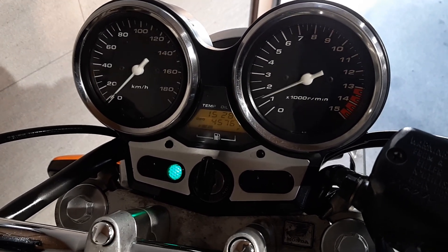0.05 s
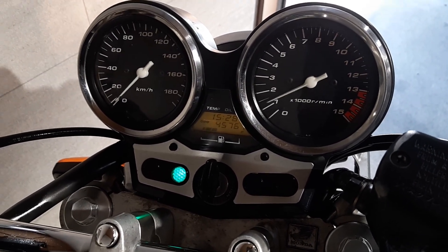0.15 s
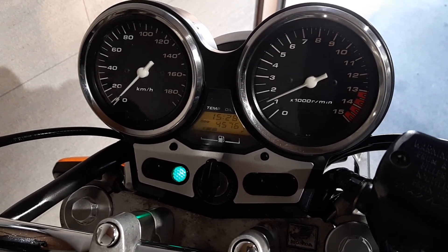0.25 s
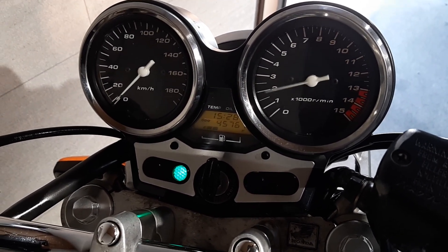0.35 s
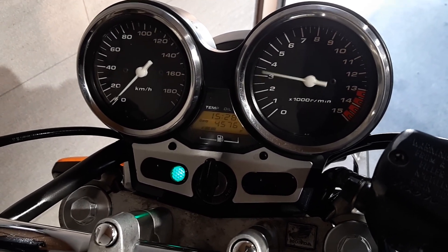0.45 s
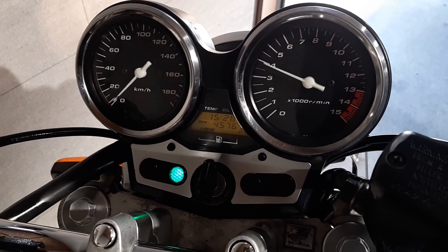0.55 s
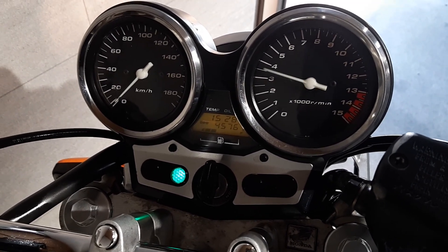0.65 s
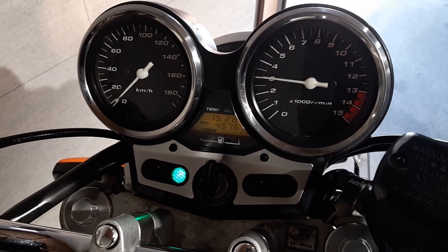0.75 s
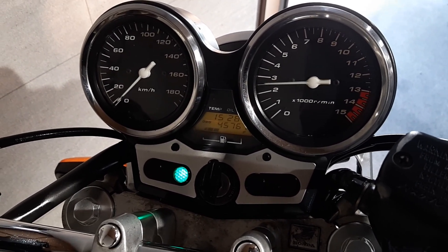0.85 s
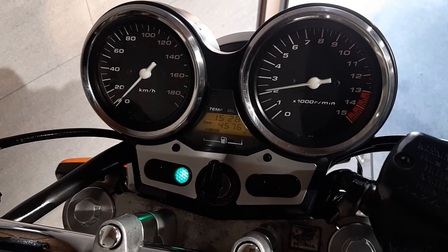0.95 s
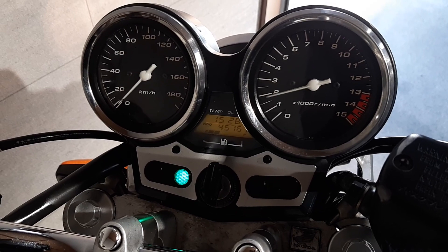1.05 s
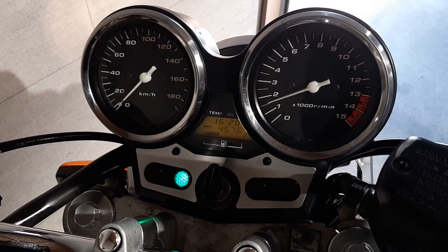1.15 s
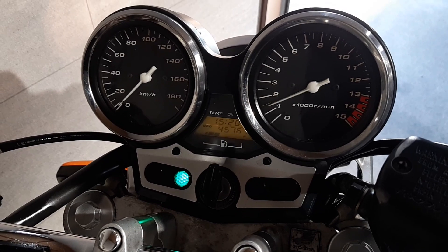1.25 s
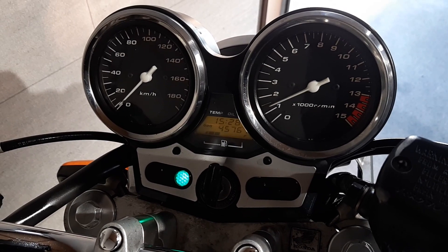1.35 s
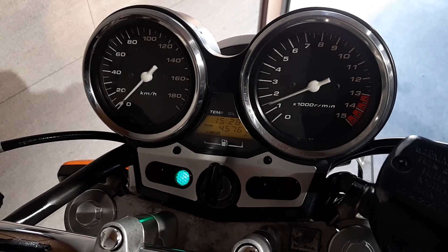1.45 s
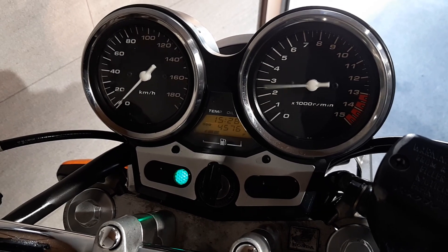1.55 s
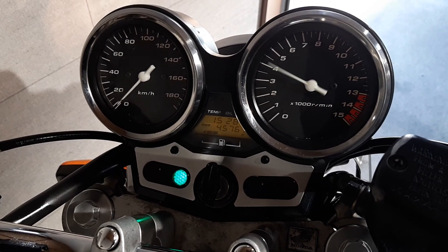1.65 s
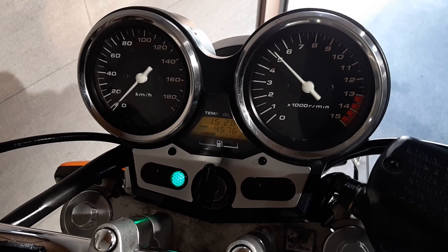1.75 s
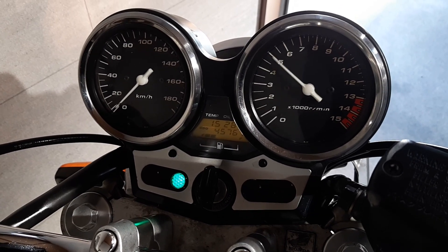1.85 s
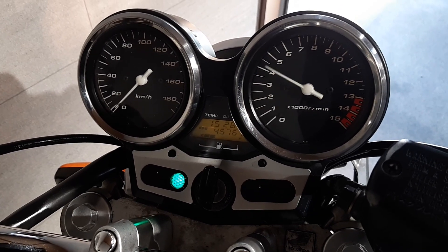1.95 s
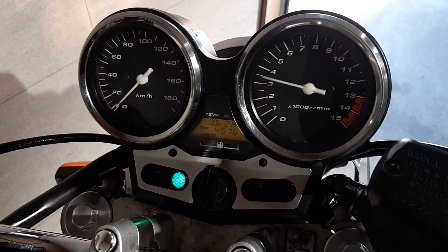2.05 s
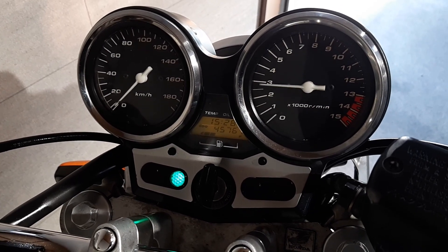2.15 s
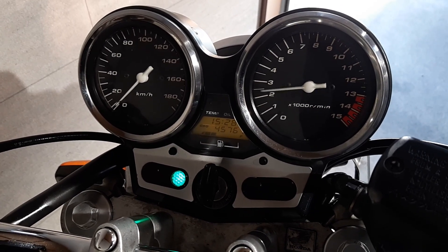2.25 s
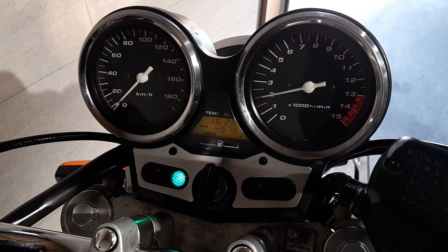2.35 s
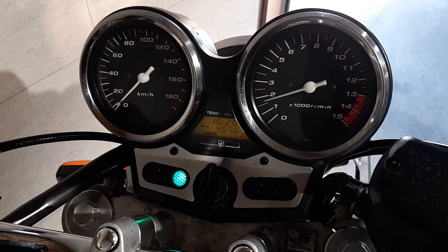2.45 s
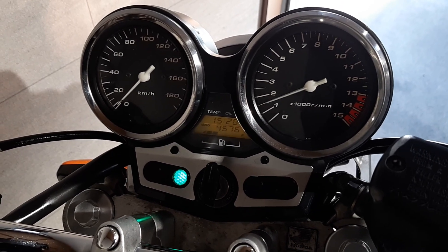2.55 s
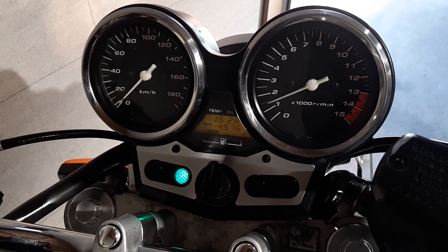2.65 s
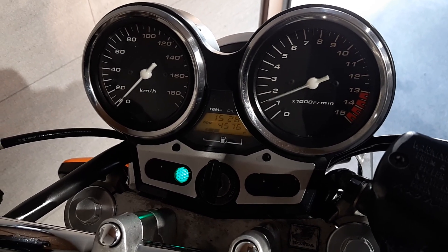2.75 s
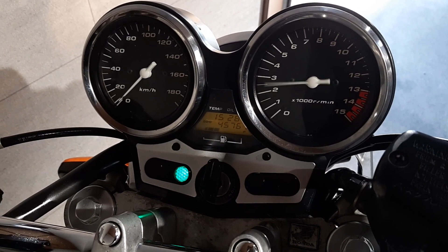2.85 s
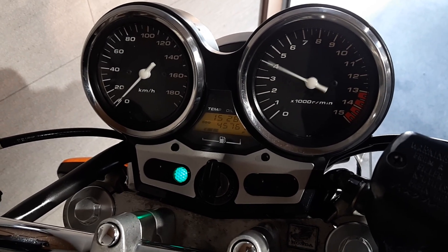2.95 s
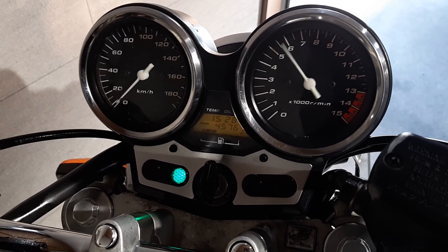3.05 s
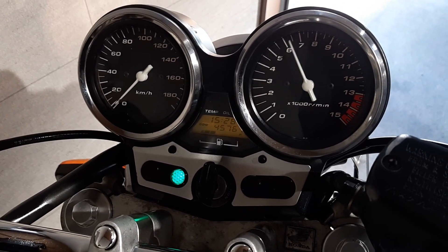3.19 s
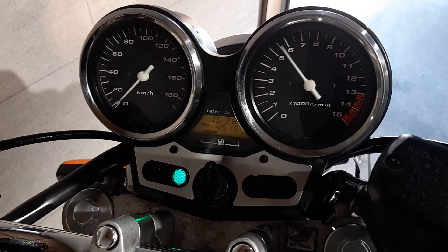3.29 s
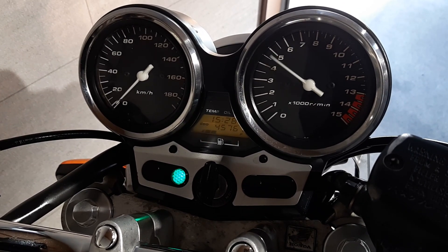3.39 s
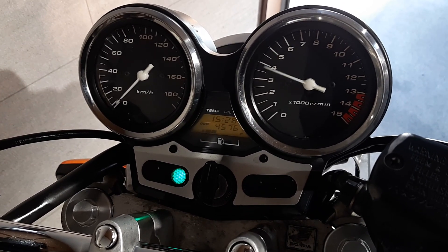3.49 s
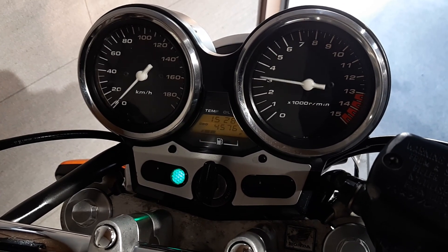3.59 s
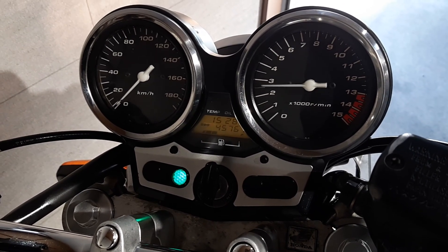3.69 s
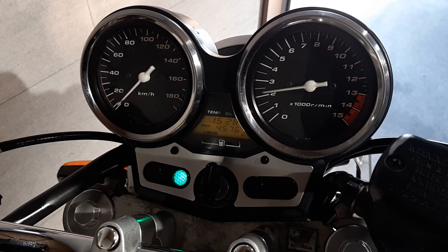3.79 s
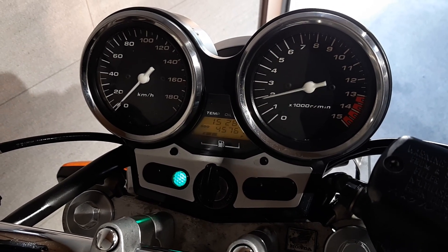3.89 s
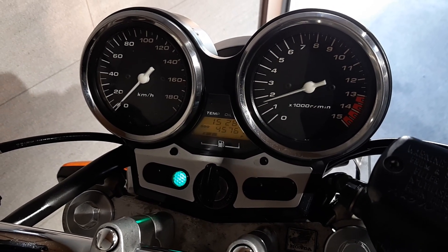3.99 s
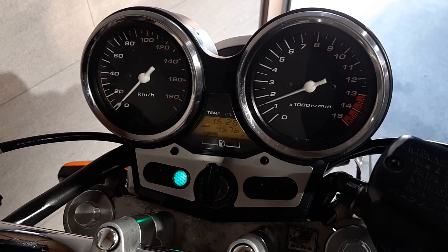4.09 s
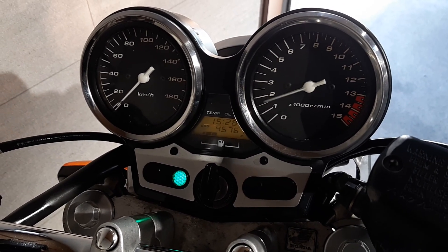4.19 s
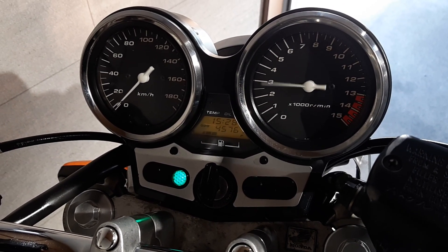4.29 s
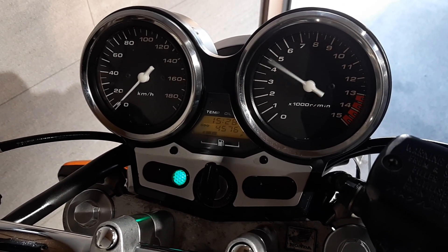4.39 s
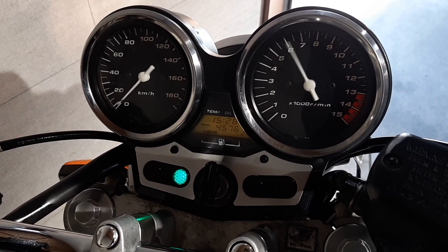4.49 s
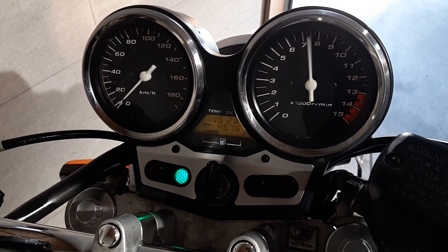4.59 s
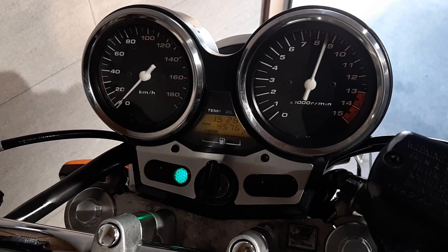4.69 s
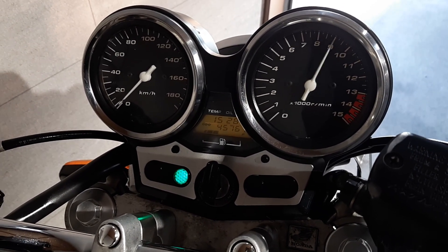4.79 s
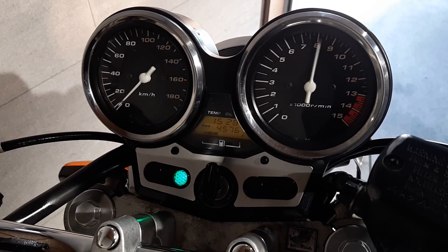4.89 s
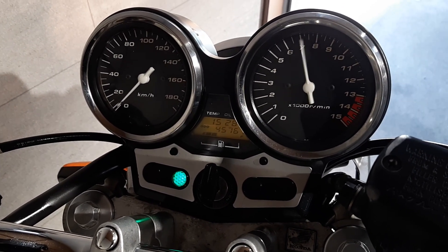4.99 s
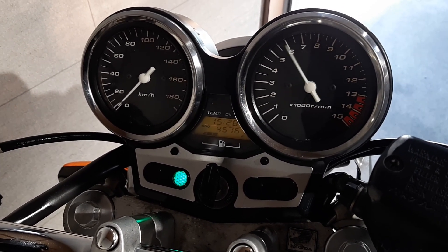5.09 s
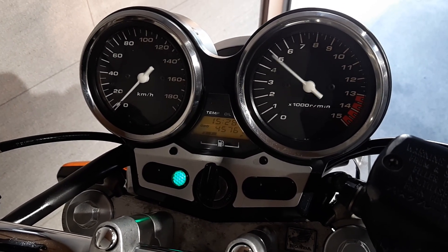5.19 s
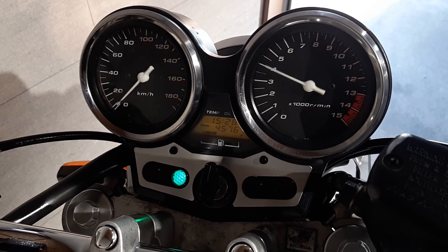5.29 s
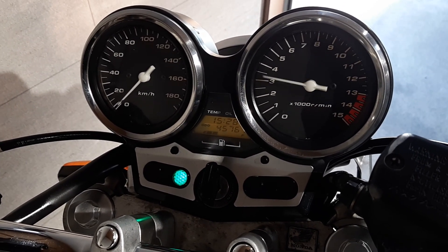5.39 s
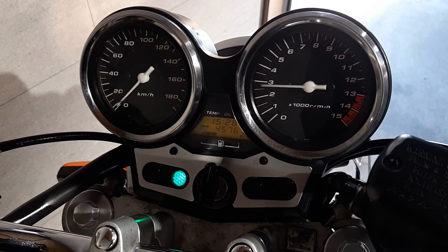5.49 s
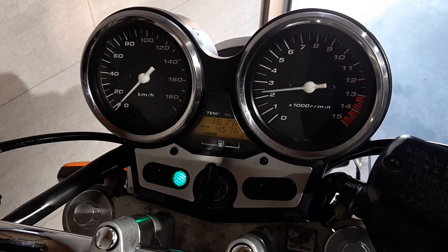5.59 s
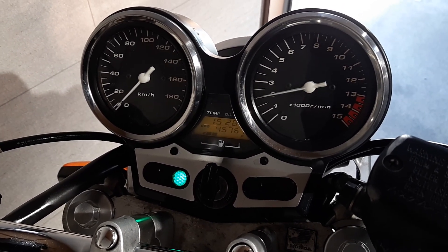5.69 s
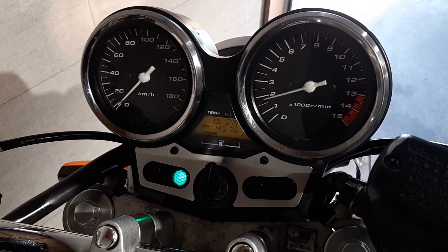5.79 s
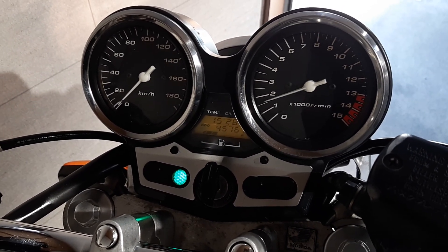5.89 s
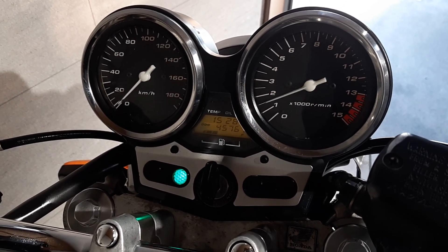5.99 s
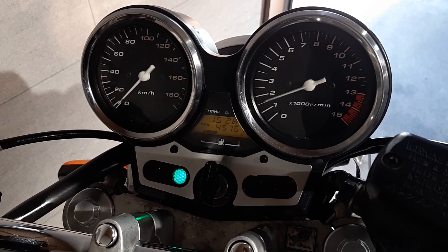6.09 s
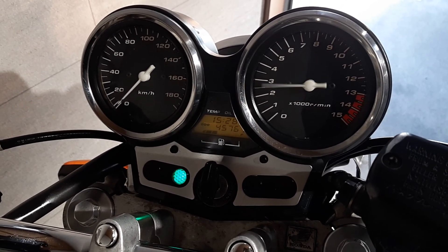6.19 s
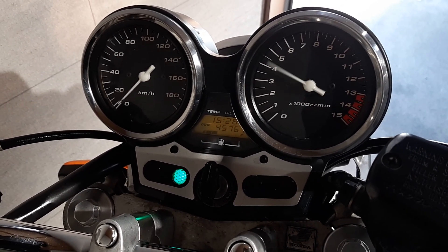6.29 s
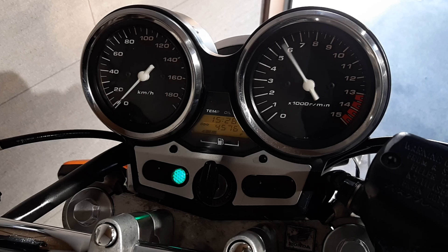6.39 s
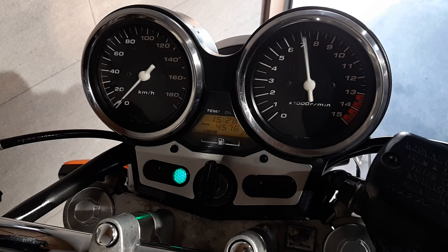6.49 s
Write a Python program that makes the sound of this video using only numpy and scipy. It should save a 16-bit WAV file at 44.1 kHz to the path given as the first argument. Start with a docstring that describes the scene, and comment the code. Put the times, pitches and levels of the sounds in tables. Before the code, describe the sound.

A four-cylinder motorcycle idles low and ragged for an instant in a shop, then the throttle is blipped five times. Each rev leaps from a throaty burble to a smooth, hard howl and sinks back with a soft, uneven overrun. Intake hiss and metallic valve and chain rattle rise with speed. Close stereo pickup at the handlebars, bass central, treble wide, with short wall reflections.

```python
"""A four-cylinder motorcycle engine idles for a moment, then is revved five times inside a shop.
Firing pulses ring the resonances of a loud exhaust pipe, and gas rushes out behind them.
The throttle hisses and whistles at the intake as it opens; valve gear and cam chain rattle with the speed.
The walls answer each ear differently: the bass stays near mono, the treble is broad."""
import sys
import numpy as np
from scipy import signal
from scipy.fft import rfft, irfft, next_fast_len
from scipy.io import wavfile
from scipy.ndimage import map_coordinates

SR = 44100
rng = np.random.default_rng(int(sys.argv[2]) if len(sys.argv) > 2 else 0)


def int16_out(signal):
    """Quantize to a 16-bit WAV file."""
    q = np.round(np.clip(np.atleast_2d(signal).T, -1, 1) * 32767)
    wavfile.write(sys.argv[1], SR, q.astype(np.int16))


def level_to_linear(level):
    """Convert decibel levels to linear amplitude factors, elementwise."""
    exponent = np.asarray(level, float) / 20
    return 10 ** exponent


N = 288414  # length in samples


def unit(x):
    """Normalisation: the signal scaled to an rms of 1."""
    return x / np.sqrt(np.mean(x ** 2) + 1e-20)


def along(points, hz):
    """Interpolation of (f/Hz, value) points on a logarithmic frequency axis."""
    f, v = np.transpose(points)
    return np.interp(np.log(hz + 1), np.log(f + 1), v)


def curves(rows):
    """Linear interpolation in time: one value per sample for each column after t/s."""
    t, *columns = np.transpose(rows)
    return [np.interp(np.arange(N) / SR, t, column) for column in columns]


def wobble(rate):
    """Slow random modulation: a smooth curve through rate random knots per second."""
    knots = rng.standard_normal(int(N * rate / SR) + 4)
    return map_coordinates(knots, [np.arange(N) * rate / SR])


def filtered(x, response):
    """Linear filtering: the spectrum of x times a complex response of frequency."""
    m = next_fast_len(N + SR // 2)
    hz = np.fft.rfftfreq(m, 1 / SR)
    return irfft(rfft(x, m) * response(hz), m)[..., :N]


def coloured(x, spectrum):
    """Spectral shaping: x filtered through (f/Hz, level/dB) points, then scaled to rms 1."""
    return unit(filtered(x, lambda hz: level_to_linear(along(spectrum, hz))))


def pipe(hz):
    """Modal superposition: resonances add with their signs; like-signed neighbours leave a notch between."""
    # exhaust and shop resonances: f/Hz, width/Hz, level/dB, sign
    resonances = [(58, 30, -14, -1), (88, 15, 3, 1), (117, 18, -3, -1), (151, 18, -5, -1), (177, 16, -1, 1),
                  (211, 20, 0, 1), (247, 16, -2, 1), (277, 14, -1, 1), (299, 18, 0, -1), (370, 30, -8, -1),
                  (447, 22, -4, -1), (478, 22, -4, 1), (530, 35, -5, 1), (590, 35, -6, 1),
                  (640, 40, -4, -1), (730, 45, -5, -1), (900, 60, -3, -1), (1120, 100, -10, -1)]
    modes = 0
    for centre, width, db, sign in resonances:
        modes = modes + sign * level_to_linear(db) * 1j * hz * width / (centre * centre - hz * hz + 1j * hz * width)
    return modes * 1j * hz / (35 + 1j * hz)  # first-order high-pass at 35 Hz


def exhaust(rate):
    """Source and filter: multiples of the firing rate and random blow errors ring the pipe; gas noise follows."""
    # throttle, even under load and ragged on the overrun and at idle: t/s, blow level/dB, ragged share (0-1)
    throttle = [(0, -18.5, 0.48), (.13, -22, 0.54), (.22, -16.5, 0.26), (.28, -10, 0.16), (.34, -6.5, 0.4),
                (.45, -9, 0), (.5, -14, 0.6), (.6, -14, 0.31), (.74, -18, 0.3), (.82, -20, 0.23),
                (1, -21.5, 0.36), (1.15, -20, 0.43), (1.28, -20, 0.47), (1.34, -19.5, 0.4),
                (1.4, -8.5, 0.18), (1.48, -9.5, 0.17), (1.66, -7, 0.23), (1.76, -13, 0.03),
                (1.82, -13.5, 0.37), (1.95, -14, 0.26), (2.08, -16.5, 0.38), (2.2, -21.5, 0.28),
                (2.45, -22, 0.54), (2.56, -21.5, 0.57), (2.66, -20, 0.23), (2.74, -11, 0.17),
                (2.9, -6.5, 0.13), (3.06, -7.5, 0.05), (3.22, -10.5, 0.24), (3.3, -15.5, 0.27),
                (3.45, -14.5, 0.42), (3.6, -18.5, 0.45), (3.72, -20.5, 0.27), (3.9, -21, 0.37),
                (4.08, -19, 0.4), (4.16, -10.5, 0.24), (4.3, -7, 0.11), (4.5, -7.5, 0.03), (4.7, -10, 0.18),
                (4.8, -7.5, .04), (4.92, -9.5, 0.11), (5.03, -14, 0.15), (5.12, -19, 0.49),
                (5.3, -19, 0.37), (5.42, -21.5, 0.42), (5.55, -24.5, 0.35), (5.75, -25.5, 0.43),
                (5.98, -24.5, 0.34), (6.07, -12, 0.34), (6.2, -8.5, .08), (6.54, -7.5, 0.02)]
    # header pipes shape the blow with speed: firings per s,
    # level/dB of the half, first, second, third, fourth and fifth multiple
    header = [(45.2, -13, 2, 8.5, -14, -10, -4), (65, -20, 1.5, 4, -2.5, -3, -12),
              (82, -17, 1, -17, -3.5, -10, -16), (108.5, -21, 3, 2, -6.5, -32, -18),
              (162, -48, -5, -3.5, -13, -13.5, -18), (190, -16.5, 0, -5.5, -21, -9, -20),
              (219, -8.5, -1, -4.5, -6.5, -11.5, -20), (301, -13.5, -4, -5, -12.5, -21, -22)]
    # spectrum of the gas rush in the pipe: f/Hz, relative level/dB
    gas_spectrum = [(190, -14), (330, -0.5), (398, -4), (592, -5), (720, -1.5), (860, -5), (1610, -13.5),
                    (2500, -16.5), (3250, -12), (5500, -120)]
    # share of the walls in the ringing exhaust: f/Hz, level/dB
    wall_share = [(60, -28), (200, -28), (500, -18), (1200, -6)]

    blow_db, ragged = curves(throttle)
    firings = np.cumsum(rate) / SR
    speeds, *multiples_db = np.transpose(header)

    weak_db = -27 * ragged  # weak, ragged blows are rounder: all but the firing tone fades
    even = 0
    for k, db in zip([.5, 1, 2, 3, 4, 5], multiples_db):
        level_db = np.interp(rate, speeds, db) + (k != 1) * weak_db
        even = even + level_to_linear(level_db) * np.cos(2 * np.pi * k * firings)
    cylinders = 1 + 0.22 * np.cos(np.pi * firings / 2)  # one cylinder of four blows harder
    drift = level_to_linear(9.4 * ragged * wobble(16))  # the mixture drifts from firing to firing

    # each firing adds its own random error
    at = np.flatnonzero(np.diff(np.floor(firings)) > 0)
    strength = rng.standard_normal(len(at)) * SR / rate[at] * ragged[at]
    errors = np.bincount(at, strength, N)
    uneven = filtered(errors, lambda hz: 1.16 / (1 + 1j * hz / 130) ** 3)  # a misfire is a soft, long push

    blows = level_to_linear(blow_db) * (drift * cylinders * even + uneven)
    ringing = filtered(blows, pipe)
    ringing_walls = filtered(shop(ringing), lambda hz: level_to_linear(along(wall_share, hz)))

    puffs = 1 + 0.26 * np.cos(2 * np.pi * firings)
    gas_db = 1.185 * blow_db - 17 + 1.78 * wobble(12)
    gas = level_to_linear(gas_db) * coloured(puffs * rng.standard_normal(N), gas_spectrum)
    return ringing + ringing_walls + .9 * gas + .45 * shop(gas)


def intake(rate, hiss_db):
    """Flow noise modulated by suction gulps, with a hoarse whistle that climbs with speed and then drowns."""
    # spectrum of the hiss: f/Hz, relative level/dB
    hiss_spectrum = [(1470, -65), (2500, -11.5), (4060, -11), (4740, -4.5), (6010, -12), (7230, -2),
                     (8240, -1.5), (9540, -2.5), (11100, -4.5), (15100, -8.5), (15700, -11)]
    # intake whistle: firings per s, f/Hz, relative level/dB
    whistle_track = [(59.6, 7300, -1), (110.5, 7900, -4.5), (148, 8400, -9), (212.2, 9400, -7),
                     (259.5, 9600, -26)]

    phase = 2 * np.pi * np.cumsum(rate) / SR
    gulps = 1 + .2 * np.cos(phase) + 0.19 * np.cos(phase / 4)  # each firing, and one in four
    hiss = coloured(gulps * rng.standard_normal((2, N)), hiss_spectrum)

    speeds, pitch_hz, whistle_db = np.transpose(whistle_track)
    # low-passed noise times a sine: a narrow band around the whistle pitch
    hoarse = filtered(rng.standard_normal((2, N)), lambda hz: 1 / (1 + (hz / 350) ** 2))
    whistle_phase = 2 * np.pi * np.cumsum(np.interp(rate, speeds, pitch_hz)) / SR
    whistle = unit(hoarse * np.sin(whistle_phase))
    opening_db = .5 * (hiss_db - hiss_db.max())  # the whistle fades as the throttle closes
    whistle_level = level_to_linear(np.interp(rate, speeds, whistle_db) + opening_db)

    air_level = level_to_linear(hiss_db + 2.5 + 1.2 * wobble(14))
    return air_level * (hiss + whistle_level * whistle)


def rattle(rate, rattle_db):
    """Random impacts on resonators: valve and chain ticks, bunched once a camshaft turn, ring the case."""
    # engine case rings: f/Hz, width/Hz, relative level/dB
    case_rings = [(1103, 110, -1), (1800, 93, -5), (2606, 43, -4), (3340, 72, -2), (4605, 37, 0),
                  (6720, 93, -5), (7600, 135, -4), (8220, 270, -7)]
    # overall spectrum of the rattle: f/Hz, relative level/dB
    rattle_spectrum = [(240, -12), (400, -3), (685, -1), (774, -20), (876, 1.5), (990, -12.5), (1140, -5.5),
                       (1570, -10), (4600, -5), (5710, -7.5), (7880, -10.5), (15700, -26)]

    density = 25 * rate / SR  # tick probability per sample: 25 ticks a firing on average
    ticks = (rng.random((2, N)) < density) * rng.standard_normal((2, N))
    blur = ticks / np.sqrt(density) + 1.1 * rng.standard_normal((2, N))
    camshaft = np.pi * np.cumsum(rate) / SR / 2  # one turn in four firings
    valves = 1 + 0.57 * np.exp(4 * (np.cos(camshaft) - 1))

    def rings(hz):
        """Resonance peaks of the case above a flat floor."""
        return 1 + sum(level_to_linear(db + 1.4) / (1 + ((hz - centre) / width) ** 2) for centre, width, db in case_rings)

    level = level_to_linear(rattle_db + 4.5 + 0.83 * wobble(8))
    return level * coloured(filtered(valves * blur, rings), rattle_spectrum)


def shop(x):
    """Diffuse reverberation: independent noise tails for the two ears, each frequency decaying at its own rate."""
    # reverberation time of the shop: f/Hz, t60/s
    decay = [(80, 1), (500, 0.25), (3000, 0.3), (12000, 0.17)]
    hz, t, z = signal.stft(rng.standard_normal((2, SR // 2)), SR, nperseg=256)
    fade = level_to_linear(-60 * t / along(decay, hz)[:, None])
    tail = signal.istft(z * fade, SR, nperseg=256)[1]
    return signal.fftconvolve(x[None], tail / np.linalg.norm(tail[0]), axes=1)[:, :N]


def spread(pair, wet):
    """Interaural decorrelation: each ear hears its own direct part and a shared source off the walls."""
    return np.sqrt(1 - wet ** 2) * pair + wet * shop(pair[0])


def scene():
    """Interaural level and time differences: intake and rattle are louder, and all is earlier, on the left."""
    # course of the engine: t/s, firings per s, relative intake level/dB, relative rattle level/dB
    engine = [(0.0, 48.3, -56, -44), (0.09, 47.0, -40, -42.5), (0.14, 46.1, -58, -45),
              (0.2, 45.6, -40, -38), (0.24, 62.6, -31, -35), (0.25, 71.2, -25, -38),
              (0.27, 79.7, -21.5, -34), (0.29, 86.1, -22, -36), (0.33, 99.1, -21.5, -46),
              (0.4, 126.4, -19, -34), (0.46, 149.8, -26, -28.5), (0.47, 154.6, -28, -29.5),
              (0.49, 147.6, -38, -29), (0.6, 109.2, -37, -34.5), (0.78, 71.0, -43, -39),
              (0.93, 56.6, -45, -41.5), (1.0, 49.0, -50, -43), (1.07, 47.6, -49.5, -46),
              (1.29, 44.9, -44, -43), (1.33, 44.4, -58, -47), (1.38, 63.1, -35, -29), (1.4, 68.8, -29, -26),
              (1.48, 99.3, -20.5, -33.5), (1.51, 115.5, -19, -39), (1.56, 142.7, -19.5, -32),
              (1.6, 159.8, -19.5, -30.5), (1.66, 185.6, -22.5, -23.5), (1.67, 184.9, -22, -24.5),
              (1.71, 178.3, -33, -23), (1.8, 154.9, -34.5, -29), (2.02, 93.3, -36, -37),
              (2.06, 83.7, -38, -37.5), (2.22, 61.8, -50, -40.5), (2.29, 51.5, -51, -43),
              (2.31, 50.5, -46, -44), (2.6, 45.7, -49, -44), (2.64, 44.7, -39, -38), (2.66, 48.3, -49, -47),
              (2.69, 64.3, -34, -33.5), (2.71, 72.0, -33, -39), (2.75, 88.4, -23, -39),
              (2.77, 96.8, -25.5, -36), (2.8, 113.1, -22, -38), (2.86, 138.9, -21, -30),
              (2.9, 156.0, -19, -31.5), (2.93, 172.5, -20, -26), (2.99, 198.0, -21.5, -24.5),
              (3.04, 222.3, -21.5, -21.5), (3.06, 229.9, -26, -20), (3.08, 225.7, -24, -19.5),
              (3.13, 205.7, -27, -20.5), (3.2, 174.1, -28.5, -24), (3.3, 149.8, -38, -29.5),
              (3.44, 105.0, -34.5, -36), (3.59, 82.4, -41.5, -38.5), (3.68, 66.5, -50, -41),
              (3.79, 52.8, -48, -42), (3.97, 49.2, -47, -46), (4.08, 48.4, -43, -42.5),
              (4.11, 65.2, -36, -37), (4.13, 74.0, -32, -36), (4.15, 82.8, -28, -38),
              (4.17, 91.9, -27, -32), (4.21, 109.7, -25, -39), (4.26, 136.9, -22, -32.5),
              (4.3, 154.6, -21, -29.5), (4.35, 178.2, -20, -26.5), (4.43, 210.4, -21, -24.5),
              (4.55, 264.8, -21, -20.5), (4.59, 280, -22.5, -23), (4.7, 298.2, -27, -18.5),
              (4.79, 259.1, -24.5, -20), (4.86, 228.0, -27, -21.5), (5.08, 163.3, -34, -31.5),
              (5.17, 129.5, -41, -35), (5.28, 102.0, -45, -40.5), (5.34, 88.0, -44, -40.5),
              (5.45, 76.6, -49, -45), (5.5, 69.0, -50, -44.5), (5.7, 52.5, -53, -48),
              (5.92, 50.3, -53, -48.5), (5.97, 48.35, -49, -46), (5.99, 51.9, -40.5, -43),
              (6.03, 68.9, -37, -44), (6.06, 85.2, -28.5, -44), (6.1, 102.7, -29, -33),
              (6.12, 110.9, -26, -40), (6.16, 127.6, -21.5, -35), (6.19, 144.7, -22, -30.5),
              (6.25, 169.6, -22.5, -27.5), (6.32, 203.0, -21, -25.5), (6.36, 218.7, -23, -22.5),
              (6.47, 263.5, -20.5, -18.5), (6.5, 289.5, -24, -23.5), (6.54, 260, -23, -19)]
    rate, hiss_db, rattle_db = curves(engine)
    treble = spread(intake(rate, hiss_db), wet=.45) + spread(rattle(rate, rattle_db), wet=.55)
    left, right = exhaust(rate) + treble * level_to_linear([[.7], [-.7]])  # dB, left and right
    return np.array([left, np.roll(right, 9)])  # right ear 9 samples later


def low_pass(x):
    """Removes everything above the highest recorded frequency."""
    return signal.sosfilt(signal.butter(12, 15890, fs=SR, output="sos"), x)


def record(dry):
    """Soft saturation: peaks round off at full scale."""
    mix = dry / (1 + np.abs(dry) ** 8) ** (1 / 8)
    return low_pass(mix)


dry = scene()
out = record(dry)
int16_out(out)
```